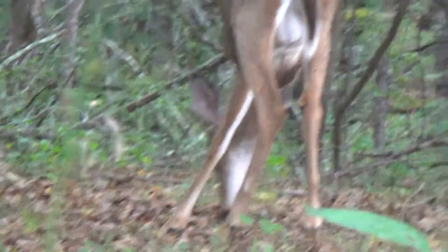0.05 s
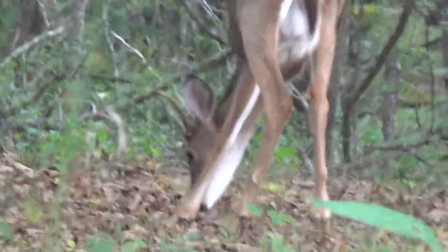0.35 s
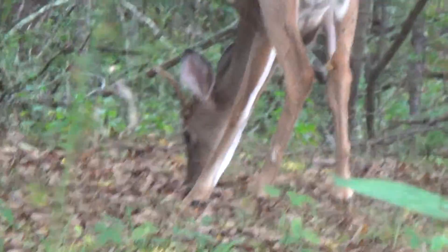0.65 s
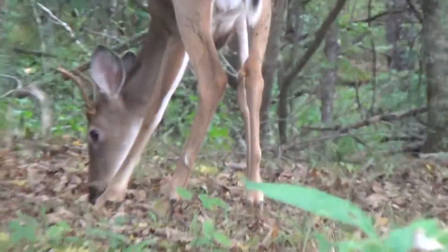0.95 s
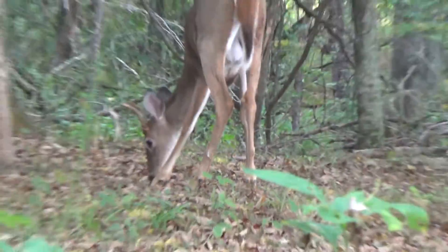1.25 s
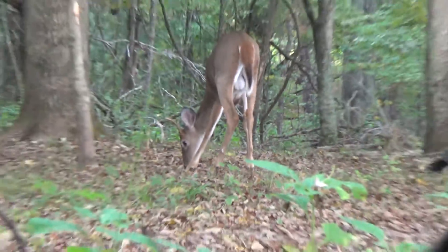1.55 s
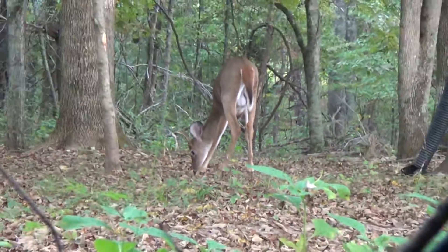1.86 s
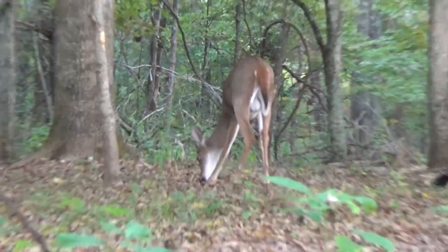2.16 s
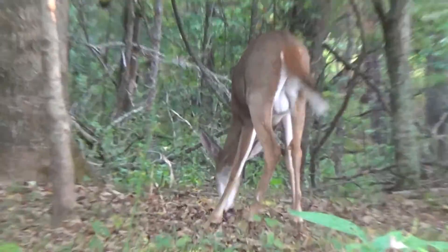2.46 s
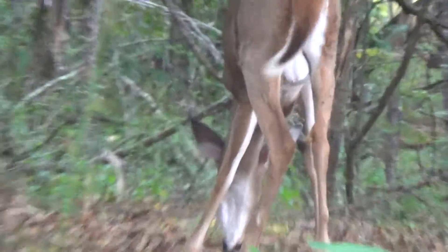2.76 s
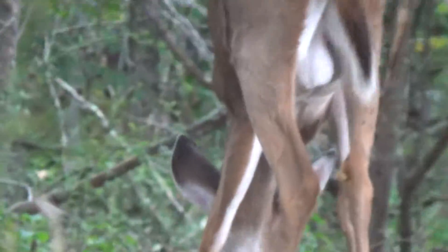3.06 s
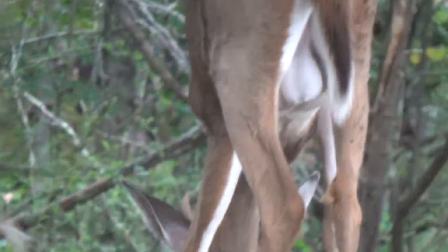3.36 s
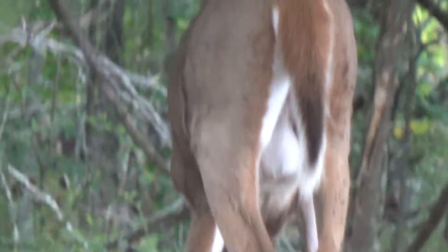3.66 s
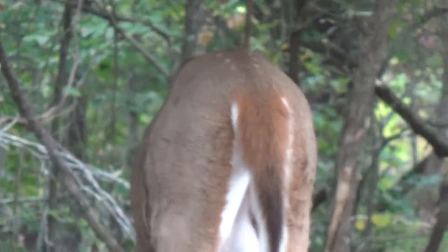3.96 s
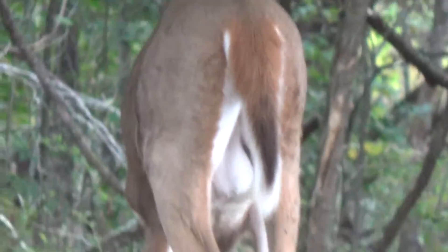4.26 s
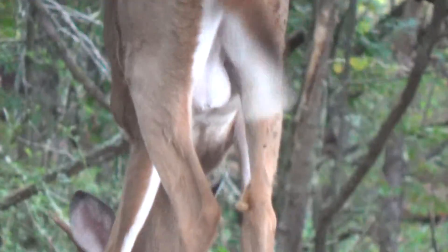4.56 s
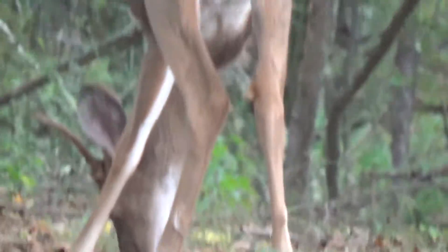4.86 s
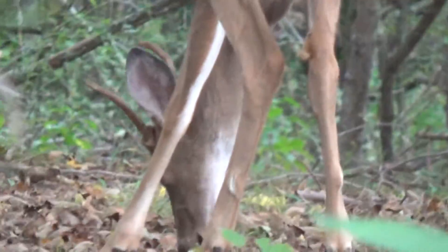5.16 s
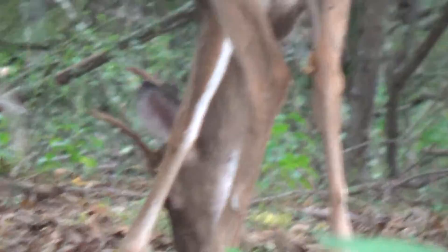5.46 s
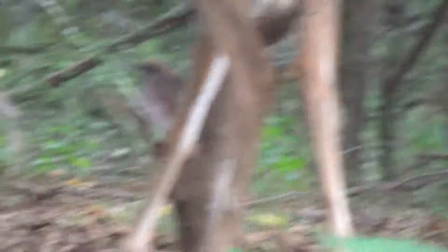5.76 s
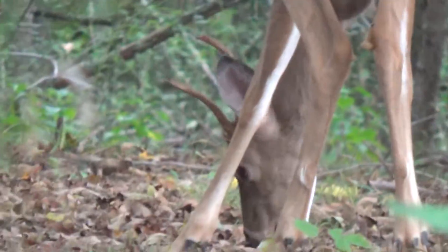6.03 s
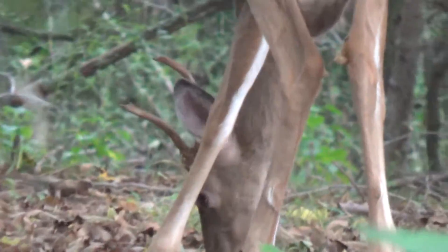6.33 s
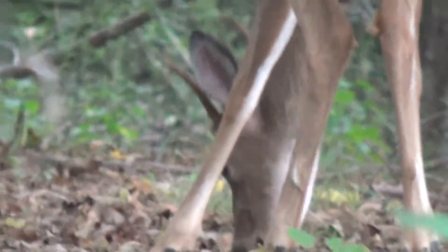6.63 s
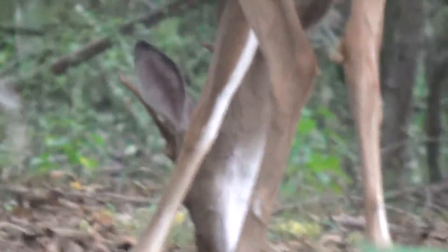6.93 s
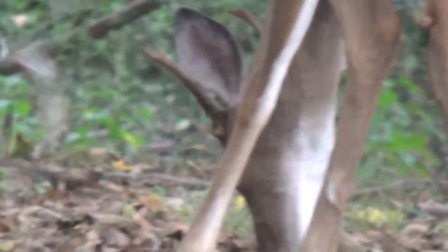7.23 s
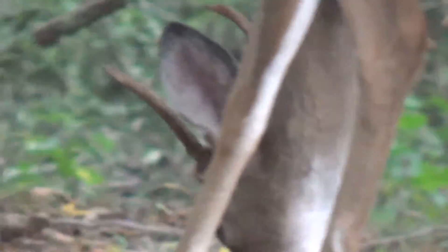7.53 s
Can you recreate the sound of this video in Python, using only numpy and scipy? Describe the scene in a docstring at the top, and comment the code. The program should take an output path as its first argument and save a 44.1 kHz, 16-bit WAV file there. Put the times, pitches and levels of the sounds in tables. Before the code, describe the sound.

Sharp, dry plastic clicks close by over a faint insect drone and soft bird chips in a quiet forest.

```python
"""Close clicks in a quiet wood

Insects drone over a soft, far rush with two low hums in it, and a bird chips thinly.
Close by come sharp, dry clicks and faint creaks, most likely from fingers on the zoom lever
and plastic shell of a hand-held camera: each snap sets the shell ringing for a moment.
The camera's line scan adds a faint, very high whistle."""
import sys
import numpy as np
from scipy import signal
from scipy.fft import rfft, irfft
from scipy.io import wavfile
from scipy.ndimage import map_coordinates

SR = 44100
rng = np.random.default_rng(int(sys.argv[2]) if len(sys.argv) > 2 else 0)


def to_wav(sig):
    """Store sig (one row per channel, or 1-D mono) as 16-bit WAV at the path in sys.argv[1].

    Samples outside -1..1 are clipped; the rate is SR.
    """
    pcm = np.clip(np.atleast_2d(sig), -1, 1) * 32767
    pcm = np.round(pcm).astype(np.int16)
    wavfile.write(sys.argv[1], SR, pcm.T)  # frames by channels


N = 343539
T = np.arange(N) / SR
SIDES = np.array([[1], [-1]])  # "mid" sound is alike in both ears; "side" is added left, taken away right

# The tone of the far rush. Each row: frequency in Hz, relative level in dB.
RUSH_TONE = [(25, -28), (50, -17.5), (100, -9), (200, -5.5), (300, -2), (550, 1), (950, -1.5), (1800, -6.5),
             (3000, -8.5), (4400, -11), (7400, -13), (8300, -13.5), (10500, -14), (15000, -18.5)]
# Where the rush sounds wide. Each row: frequency in Hz, tone change of the side part in dB.
RUSH_SIDE = [(60, -12), (110, -17), (200, -6), (380, -3.5), (700, -1), (1290, 1.5), (2380, -0.5),
             (4400, -4), (8120, -11.5), (12000, -52.5)]
# Far hums. Each row: pitch in Hz, width in Hz, level in dB before the swell.
FAR_HUMS = [(122, 14, -84), (432.6, 29, -67.5)]
# Insect choirs. Each row: pitch in Hz, width in Hz, usual level in dB.
INSECT_CHOIRS = [(5280, 380, -67.5), (7220, 460, -74.5)]
# Bird chips. Each row: start and length in seconds, first and last pitch in Hz, level in dB.
BIRD_CHIPS = [(.915, .03, 9700, 9500, -64), (.94, 0.05, 2720, 2640, -60), (1.2, 0.067, 2820, 3020, -63),
              (2.072, 0.015, 4000, 4040, -55), (3.042, .035, 8650, 7950, -62),
              (3.083, .025, 7850, 7600, -68), (4.695, 0.018, 9900, 9500, -63),
              (6.225, .045, 8150, 8000, -68), (7.624, .014, 9800, 10100, -64),
              (7.73, .018, 9950, 10250, -63), (7.748, 0.045, 9500, 9700, -58.5)]
# Creaking as the grip shifts. Each row: middle and half length in seconds, level in dB.
CREAK_SPELLS = [(.6, 0.45, -71), (1.8, .2, -70), (3.45, 0.23, -75), (5.6, 1, -73), (7.3, 0.3, -71)]
# The tone the shell gives every click. Each row: frequency in Hz, boost in dB.
SHELL_TONE = [(830, -3.5), (1340, 0.5), (2170, 2), (3400, 0.9), (5900, 1.7), (10100, 0.9), (14200, -12)]
# The shell's own notes. Each row: pitch in Hz, dB above the click at that pitch, fade time in seconds.
SHELL_NOTES = [(459, -6, 0.079), (754, -9, 0.039), (850, -5, 0.093), (1130, 9, 0.019), (2025, -15, 0.15),
               (2235, -5.5, 0.073), (3620, -29, 0.053)]
# The borders of a click's seven frequency bands, in Hz.
BAND_EDGES_HZ = [680, 1020, 1750, 2700, 4300, 8000, 12800, 15700]
# Those bands, low to high. Each row: side level over mid in dB, tail level in dB, rise time in seconds.
BAND_SHAPES = [(-9, -1, 0.00067), (-5, -17.5, 0.00022), (-2, -20, 0.00033), (-4, -21, 0.00078),
               (-9, -16, 0.00058), (-17, -17.5, 0.00096), (-25, -19, .0003)]
# Broad, hard snaps and narrow, light ticks. Each row: start in seconds, base level in dB, pitch in Hz,
# drop above the pitch in dB per octave, relative level of the ring in dB, fade time in seconds.
CLICK_EVENTS = [(.418, -55.5, 3000, 16, 12, .03), (0.441, -62, 2420, 15, 14, 0.033),
                (0.4771, -25.5, 2210, 6.5, 2, 0.026), (0.651, -54, 3370, 10, 9, 0.029),
                (0.7516, -49, 11000, 27, 9, .016), (.753, -52, 2680, 21, 14, .021),
                (0.7707, -50, 1820, 14, 0, .017), (.867, -51.5, 1100, 9, 7, 0.014),
                (0.9342, -54.5, 2660, 14, 14, 0.03), (1.5312, -47.5, 1330, 11, 19, 0.018),
                (1.5349, -41.5, 1560, 4, 15.5, 0.019), (2.0251, -41, 1270, 6.5, -12, 0.016),
                (2.976, -59.5, 1930, 1.5, 6, .03), (3.15, -26.5, 2036, 5.5, 13.5, 0.023),
                (3.3037, -57.5, 3330, 9, 10, .021), (5.1098, -49, 12500, 23, 0, 0.013),
                (5.2668, -41, 2090, 6, 4, 0.021), (5.7743, -56, 1000, 7, 3, .026),
                (6.023, -53.5, 3050, 22, 8, 0.025), (6.062, -58, 2630, 12, 5, .03),
                (6.253, -48, 2220, 12, 13, 0.0082), (6.3953, -31, 1437, 4, 13, 0.02),
                (6.5069, -57, 3200, 10, 5, .025), (7.0086, -51, 1290, 4, 5, .025),
                (7.0417, -52, 1400, 6, 4, 0.017), (7.053, -36, 930, 6.5, 12, 0.011),
                (7.0672, -37.5, 6550, 5.5, -6, .016)]


def undb(db):
    """Turn decibels into a gain."""
    return 10 ** (np.asarray(db) / 20)


def unit(x):
    """Scale to an average (rms) level of 1."""
    return x / np.sqrt(np.mean(x ** 2))


def decay(t, t60):
    """Fade by 60 dB in t60 seconds, the fade time."""
    return np.exp(-np.log(1000) * t / t60)


def swell(middle_s, half_s):
    """A smooth rise and fall, 1 at its middle."""
    return np.exp(-((T - middle_s) / half_s) ** 2)


def wander(per_second):
    """Random values, about 1 in size, joined smoothly."""
    return map_coordinates(rng.standard_normal(512), [T * per_second], order=2, mode="wrap")


def tone_db(hz, rows):
    """Read the level at hz off a curve of (Hz, dB) points."""
    points, db = np.transpose(rows)
    return np.interp(np.log(hz), np.log(points), db)


def noise(gain):
    """Noise of level 1, its tone shaped by gain(Hz)."""
    size = N + 2061  # padded for a quick FFT
    hz = np.fft.rfftfreq(size, 1 / SR) + 1
    spectrum = rfft(rng.standard_normal(size)) * gain(hz)
    return unit(irfft(spectrum)[:N])


def band(hz, width, side_db):
    """A narrow band of noise, partly different left and right."""
    mid, side = (noise(lambda f: 1 / (1 + (1.28 * (f - hz) / width) ** 4) ** .5) for _ in range(2))
    return mid + undb(side_db) * SIDES * side


def add(out, start_s, sound):
    """Mix a sound in at its start time."""
    i = max(int(start_s * SR), 0)
    out[:, i:i + sound.shape[-1]] += sound[..., :max(N - i, 0)]


def far_rush(level_db=-57, drift_db=-.16, hum_swell_db=4):
    """The wood's soft rush, with two low hums that swell once."""
    mid = noise(lambda f: undb(tone_db(f, RUSH_TONE)))
    side = noise(lambda f: undb(tone_db(f, RUSH_TONE) + tone_db(f, RUSH_SIDE)))
    rush = undb(level_db + drift_db * wander(2.73)) * (mid + undb(-3.5) * SIDES * side)
    hums = sum(undb(db) * band(hz, width, side_db=-14) for hz, width, db in FAR_HUMS)
    return rush + undb(hum_swell_db * swell(middle_s=5.3, half_s=.63)) * hums


def insects(flicker_db=1.0, break_s=3.47, drop_s=.2, drop_db=7, return_db_per_s=1.15):
    """Many wings blur into a drone; a trill breaks off and creeps back; one insect buzzes briefly."""
    choirs = sum(undb(db + flicker_db * wander(5.6)) * band(hz, width, side_db=-7)
                 for hz, width, db in INSECT_CHOIRS)
    since_break = np.maximum(T - break_s, 0)
    trill_db = -71.5 - drop_db * np.minimum(since_break / drop_s, 1) + return_db_per_s * since_break
    trill = undb(trill_db) * band(hz=6390, width=260, side_db=-8)
    buzz = undb(-68) * swell(middle_s=5.46, half_s=.075) * band(hz=11000, width=1700, side_db=-36)
    return choirs + trill + buzz


def bird(waver=.0056):
    """Each chip is a short, slightly wavering slide in pitch."""
    out = np.zeros((2, N))
    wobble = 1 + waver * wander(60)
    for start, length, first_hz, last_hz, db in BIRD_CHIPS:
        progress = np.linspace(0, 1, int(length * SR))
        hz = (first_hz + (last_hz - first_hz) * progress) * wobble[:len(progress)]
        add(out, start, undb(db) * np.sin(np.pi * progress) * np.sin(2 * np.pi * np.cumsum(hz) / SR))
    return out


def line_whistle(db=-65.5, line_hz=15734.3, sweep_hz=59.94, pause_share=.08, pulse_hz=12.97):
    """A faint, very high line-scan whistle that pauses briefly each sweep."""
    pulse = 1 + .4 * np.sin(2 * np.pi * pulse_hz * T)  # its level is also made to pulse
    scanning = T * sweep_hz % 1 > pause_share
    return undb(db) * pulse * np.sin(2 * np.pi * line_hz * T) * scanning


def creaks(hz=3310, t60=.026, pitch_spread=.058, spread_db=2, ear_phase=.17):
    """The plastic slips in tiny steps, each a tick that rings on one note."""
    out = np.zeros((2, N))
    t = np.arange(SR // 20) / SR
    starts = np.cumsum(rng.uniform(.03, .11, 160))
    for start, (size, detune) in zip(starts[starts < N / SR], rng.standard_normal((160, 2))):
        ring = np.sin(2 * np.pi * hz * (1 + pitch_spread * detune) * t + ear_phase * SIDES)
        add(out, start, undb(spread_db * size) * ring * decay(t, t60))
    return unit(out) * sum(undb(db) * swell(middle, half) for middle, half, db in CREAK_SPELLS)


def click(level_db, pitch_hz, drop_per_octave, ring_db, t60, tail_t60=.075, ear_phase=.39):
    """A snap starts many short vibrations, strongest near its pitch; a few shell notes ring on."""
    t = np.arange(SR // 5) / SR
    centres = np.sqrt(np.multiply(BAND_EDGES_HZ[1:], BAND_EDGES_HZ[:-1]))
    octaves = np.log2(centres / pitch_hz)
    drop_db = drop_per_octave * np.maximum(octaves, -.53 * octaves)  # gentler below the pitch
    band_db = level_db + tone_db(centres, SHELL_TONE) - drop_db
    out = 0
    for k, (side_db, tail_db, rise_s) in enumerate(BAND_SHAPES):
        band_t60 = t60 * (2000 / centres[k]) ** .33  # high bands die sooner
        fade = np.minimum(t / rise_s, 1) * (decay(t, band_t60) + undb(tail_db) * decay(t, tail_t60))
        bandpass = signal.butter(3, BAND_EDGES_HZ[k:k + 2], "band", fs=SR, output="sos")
        burst = signal.sosfilt(bandpass, rng.standard_normal((2, len(t))) * fade)
        burst[1] -= burst[0] * (burst[0] @ burst[1]) / (burst[0] @ burst[0])  # the side noise is made to share nothing with the mid noise
        power = np.sum(burst ** 2, axis=1, keepdims=True) / (SR / 100)  # as if packed into 10 ms
        mid, side = burst / np.sqrt(power)
        out += undb(band_db[k]) * (mid + undb(side_db) * SIDES * side) / np.hypot(1, undb(side_db))
    # the struck part starts ringing in 0.5 ms, the shell in 1.5 ms
    notes = [(pitch_hz, ring_db, t60, .0005)] + [(*note, .0015) for note in SHELL_NOTES]
    for hz, db, note_t60, rise_s in notes:
        phase = 2 * np.pi * rng.random() + ear_phase * SIDES  # left and right are out of step
        fade = decay(t, note_t60) * (1 - np.exp(-t / rise_s))
        out += undb(db + np.interp(hz, centres, band_db)) * np.sin(2 * np.pi * hz * t + phase) * fade
    return out


def clicks(lowest_hz=400):
    """Fingers snap and tick on the plastic; the small shell gives off no bass."""
    out = np.zeros((2, N))
    for start, *settings in CLICK_EVENTS:
        add(out, start, click(*settings))
    return signal.sosfilt(signal.butter(2, lowest_hz, "high", fs=SR, output="sos"), out)


def scene():
    """Near clicks over the quiet wood."""
    return clicks() + creaks() + far_rush() + insects() + bird() + line_whistle()


def record(dry):
    """Cut the treble steeply above 15760 Hz."""
    return signal.sosfilt(signal.ellip(12, .1, 70, 15760, fs=SR, output="sos"), dry)


dry = scene()
out = record(dry)
to_wav(out)
```